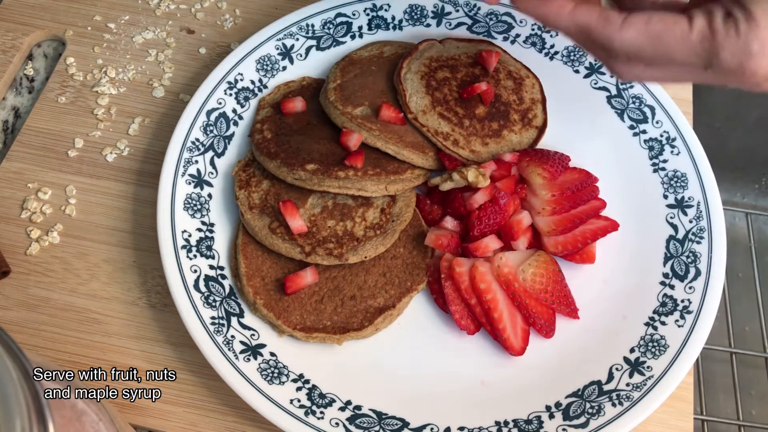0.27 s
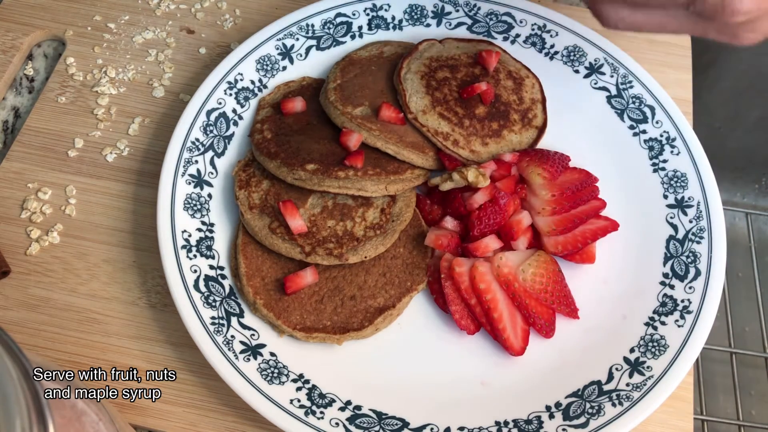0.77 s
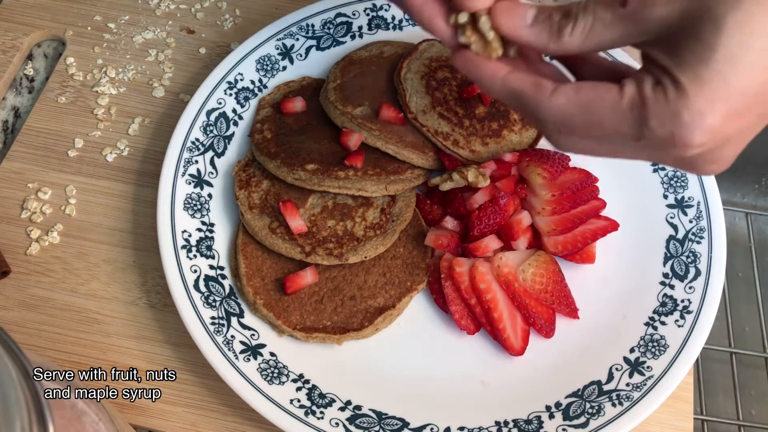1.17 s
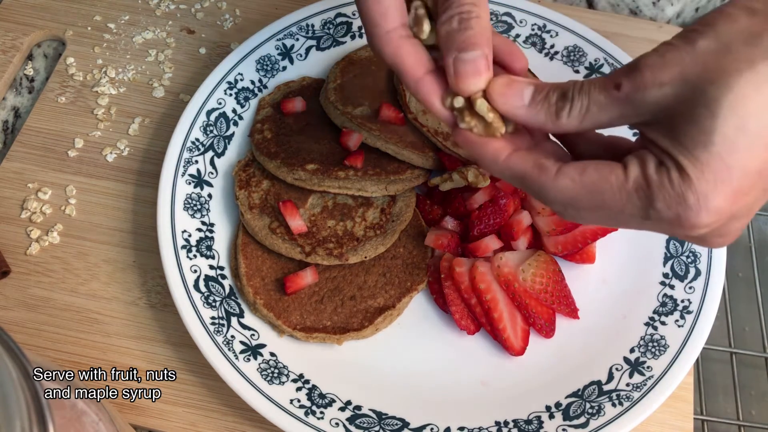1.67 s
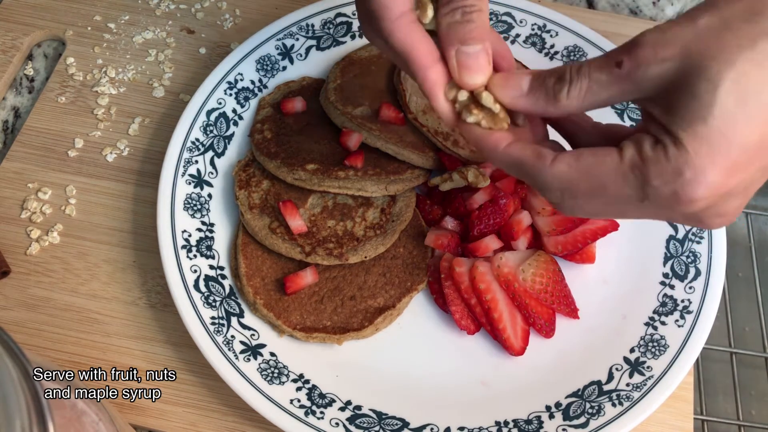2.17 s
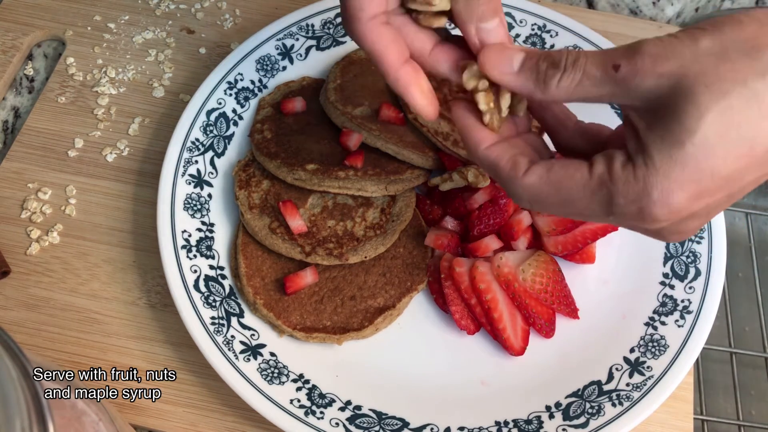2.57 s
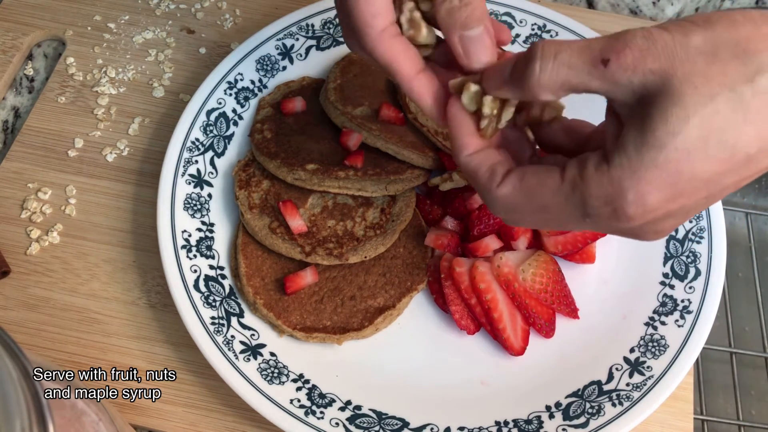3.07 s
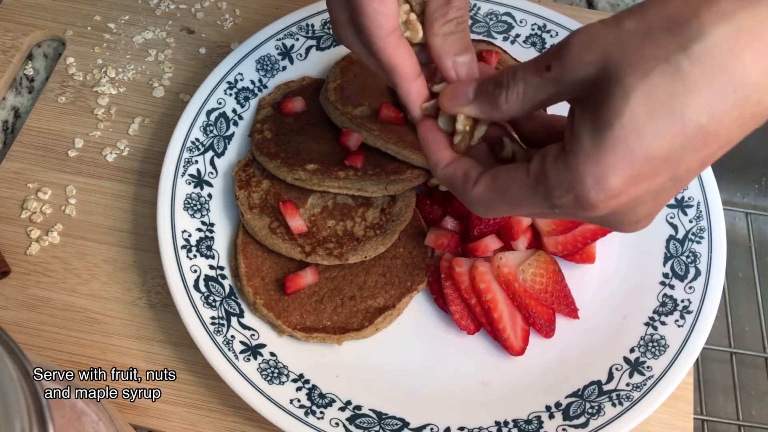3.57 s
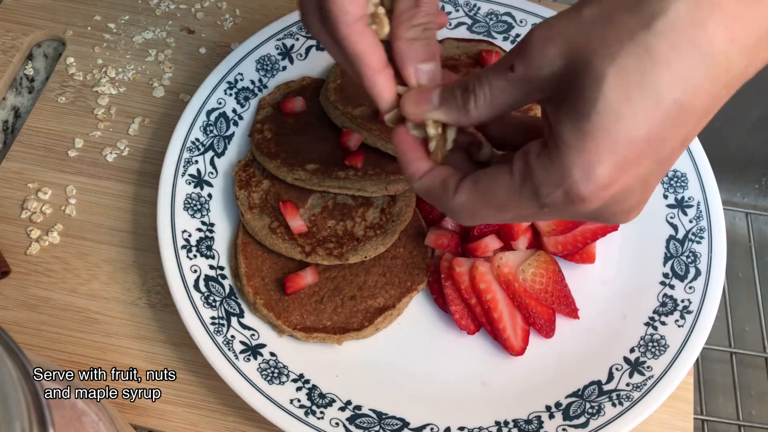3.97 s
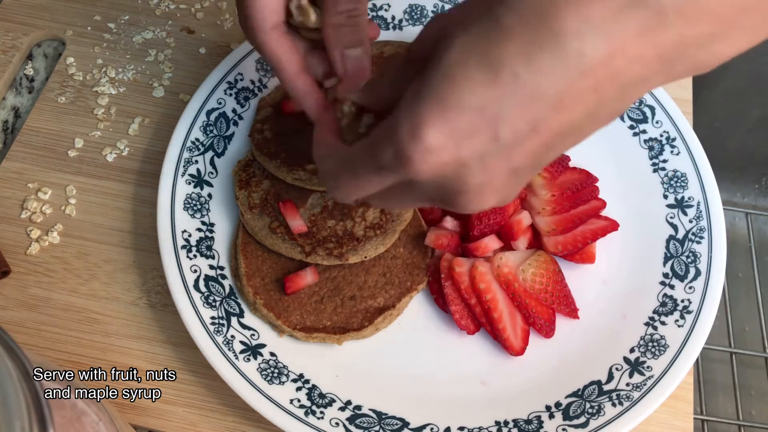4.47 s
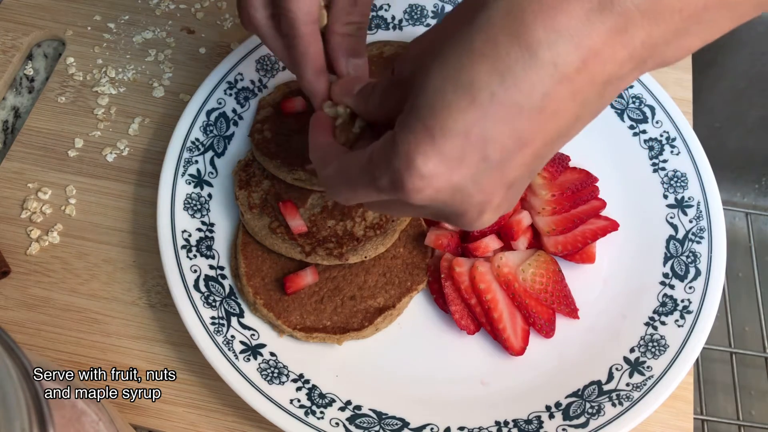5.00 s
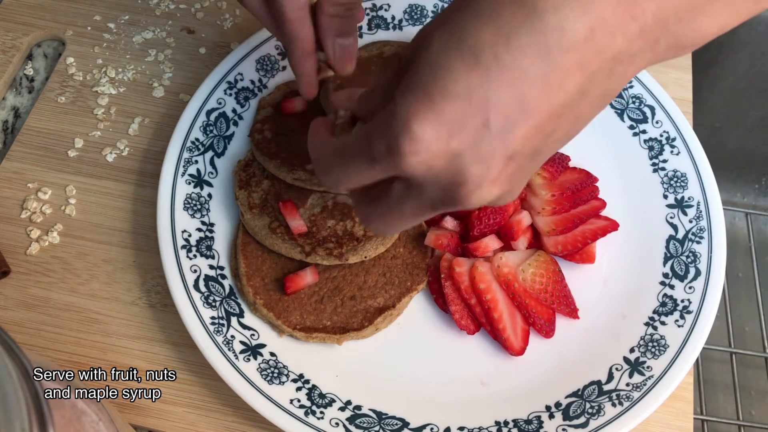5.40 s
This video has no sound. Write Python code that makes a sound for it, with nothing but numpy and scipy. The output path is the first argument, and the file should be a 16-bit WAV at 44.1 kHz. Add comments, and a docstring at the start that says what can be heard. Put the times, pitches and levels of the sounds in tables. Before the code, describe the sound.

Close, bright nut-breaking snaps and faint crumb ticks ring briefly in a small kitchen over low rumble, following a quiet cloth rustle.

```python
"""Fingers break walnuts over a plate of pancakes in a quiet kitchen, where air, a rumble and an appliance hum go on.
At first sleeves rustle (trains of tiny clicks), the cook's weight bumps softly (low noise) and skin hisses on nuts.
From about 1.6 s kernels crackle, chip and split: sharp noise snaps that ring for a few ms, with a duller knock.
The hardest split, near 1.9 s, overloads the recorder; the plate and the room throw every snap back.
More splits follow near 3.7 s; near 5.1 s a nut lands with a crack and a low thump, among chips, crumbs and taps."""
import sys
import numpy as np
from scipy import signal
from scipy.fft import rfft, irfft
from scipy.io import wavfile
from scipy.ndimage import uniform_filter1d

SR = 44100
rng = np.random.default_rng(int(sys.argv[2]) if len(sys.argv) > 2 else 0)


def dump(signal):
    """Clip the signal to [-1, 1] and save it as 16-bit WAV at the path in sys.argv[1]."""
    limited = np.clip(np.atleast_2d(signal).T, -1, 1)
    pcm = np.round(limited * 32767).astype(np.int16)
    wavfile.write(sys.argv[1], SR, pcm)


N = 248724  # length in samples
TIME = np.arange(N) / SR  # seconds

# In the colour tables only the shape counts: level_db is relative, per Hz of bandwidth.
# Colour of the still kitchen air: pitch_hz, level_db
AIR_COLOUR = [(20, 1), (35, -16), (55, -19.5), (90, -23.5), (160, -32), (320, -31.5), (550, -39),
              (900, -45), (2000, -47), (4500, -50), (10000, -46.5), (16000, -54.5)]
# Colour of the deep rumble: pitch_hz, level_db
RUMBLE_COLOUR = [(3, -10), (13, -3.5), (22, -15.5), (40, -36), (200, -73)]
# Tones of the appliance hum: pitch_hz, level_db (rms)
HUM_TONES = [(120, -69.5), (241, -76.5)]

# Sleeves rustle as the arms move: start_s, length_s, level_db (reached at the end)
ARM_MOVES = [(0.0, 0.27, -61), (0.56, 0.12, -63), (0.771, 0.19, -57.5), (1.084, 0.19, -57.5),
             (1.29, .27, -57), (2.42, 0.057, -57)]
# Colour of the rustling cloth: pitch_hz, level_db
CLOTH_COLOUR = [(60, -18), (150, -12.5), (260, -14.5), (340, 3.5), (440, 2), (490, -14), (620, -13),
                (760, -14.5), (1300, -19), (2200, -20.5), (4000, -31.5), (9000, -39.5)]
# Soft low bumps as the cook shifts weight at the counter: middle_s, length_s, level_db
WEIGHT_SHIFTS = [(.12, 0.29, -55.5), (.62, 0.09, -58.5), (1.19, 0.13, -54), (4.82, 0.099, -61)]
# Colour of those bumps: pitch_hz, level_db
SHIFT_COLOUR = [(30, -16), (80, 8.5), (150, 5.5), (220, -15), (330, -12.5), (700, -24), (2000, -62)]

# Skin slides on the nuts: middle_s, length_s, level_db
SKIN_RUBS = [(0.277, 0.22, -63), (1.212, 0.09, -65.5), (2.5, .1, -62.5), (2.755, 0.094, -60),
             (3.25, 0.44, -67), (3.65, .14, -62.5), (4.93, 0.27, -72), (5.3, 0.28, -67),
             (5.581, 0.08, -64.5)]
# Colour of the sliding skin: pitch_hz, level_db
SKIN_COLOUR = [(2000, -55), (5000, -21), (7000, -5.5), (8500, -0.5), (9700, -17), (10600, 1.5),
               (11600, -8.5), (16000, -8.5)]
# Colour of broken faces grinding together: pitch_hz, level_db
GRIND_COLOUR = [(300, -45), (1000, -33), (1800, -3.5), (2600, -10.5),
                (3500, 0.5), (5000, -1), (8000, 8.0), (14000, -22.5)]

# Near echoes off the plate, the board and the hands: middling delay_s, gain (factor)
NEAR_ECHOES = [(.0011, 0.18), (.0023, 0.22), (.0037, .22), (.0058, 0.14), (.0079, .16)]
# How long the room rings: pitch_hz, time to fall by 60 dB_s
ROOM_DECAY = [(300, 0.17), (1300, 0.42), (3500, 0.32), (6500, 0.24), (9500, 0.21), (15000, 0.13)]

# Fracture and knock levels below are relative: snap() adds its own boosts.
# Colour of a fracture: pitch_hz, level_db
CRACK_COLOUR = [(1000, -50), (3000, -38), (4300, -24), (5600, -13), (7000, -4), (7700, -7), (8600, -1),
                (10600, 2), (12200, -4.5), (14700, -10), (16500, -7.5)]
# Colour of the kernel's knock between the fingers: pitch_hz, level_db
KNOCK_COLOUR = [(120, -17), (220, -13), (380, -4), (700, -12.5), (1100, -4.5), (1400, -5), (1900, 0),
                (2250, -7.5), (2750, -5.5), (3300, 1.5), (3900, -3), (5000, 1), (8000, -10)]
# Snaps and taps with a knock level of their own: start_s, level_db, knock_db (relative to level_db)
KNOCKING_TAPS = [(0.4077, -41, -16), (2.3025, -28.5, -21.5), (3.675, -39, -19), (3.9281, -30, -21.5),
                 (4.6552, -47, -9.5), (4.7753, -52.5, -21), (4.81, -50.5, -12), (5.269, -48, -13),
                 (5.3848, -45, -7.5), (5.5563, -48.5, -6)]
# A single chip snaps off: start_s, level_db, brightness_hz
CHIP_SNAPS = [(1.6257, -28, 11600), (1.7412, -19, 9860), (1.7647, -14, 10530), (1.7798, -11, 10430),
              (1.8447, -37.5, 12000), (2.0996, -33.5, 9870), (2.2021, -23, 9200), (2.2232, -10.5, 11240),
              (2.238, -21, 11200), (2.2806, -27.5, 10300), (2.5198, -35.5, 10900), (2.5722, -33.5, 10700),
              (2.8001, -31, 11120), (2.817, -39, 10050), (2.8828, -31.5, 11300), (2.8988, -31, 10470),
              (3.0984, -45, 11100), (3.3201, -34.5, 12900), (3.5462, -36.5, 10830), (3.5989, -34, 10560),
              (3.6915, -32.5, 10400), (3.7253, -40, 12500), (3.756, -20, 10000), (4.006, -41.5, 10980),
              (4.2693, -27.5, 10500), (4.4851, -37, 9300), (4.67, -26, 10900), (5.0733, -23, 10400),
              (5.3453, -42, 12670)]
# A crack creeps on in small steps while its faces grind:
# start_s, length_s, level_db, brightness_hz, grinding_db
CREEPING_CRACKS = [(1.5833, 0.024, -25.5, 9000, -58), (2.1392, .043, -27.5, 9900, -50.5),
                   (2.8317, .011, -37, 11430, -73)]
# A kernel splits or a nut is set down hard: start_s, level_db, knock_db (relative to level_db),
# brightness_hz, thud_db, thud_pitch_hz, hand_jolt_db
HARD_CRACKS = [(1.8783, -2.5, -28.5, 9640, -29.5, 700, -61.5), (3.7385, -19, -21.5, 9550, -35.5, 1330, -55),
               (3.783, -14.5, -25.5, 10430, -32, 1060, -63), (5.0577, -18.5, -25, 11900, -34, 600, -38)]
# Every hard crack comes in three quick stages: delay_s, level_db (relative)
CRACK_STAGES = [(0, 1), (.0023, 0), (.0061, -3)]

AIR_DB = -48
MOVE_ATTACK_S, MOVE_RELEASE_S, MOVE_SWELL_DB = 0.022, 0.057, 2.5  # a move swells until it stops
CREEP_RUB_DB = -30  # hiss of skin, relative to the crack
HAND_HZ = 232  # the soft swing of the jolted hand
TAP_BRIGHT_HZ = 9470

# A chip of level CHIP_DB and brightness CHIP_HZ has the knock KNOCK_DB.
# The knock grows more slowly than the crack, and brighter chips knock less.
CHIP_DB, CHIP_HZ, KNOCK_DB = -29, 11200, -59.5
KNOCK_GROWTH, KNOCK_DB_PER_OCTAVE = .45, -17  # knock dB per crack dB; dB per octave of brightness
# A creeping crack starts hardest; its other steps fade unevenly over the run
FIRST_STEP_DB, CREEP_FADE_DB, STEP_SPREAD_DB = 6, -4.5, 3
STEP_JITTER = .14  # typical shift of a step, as a share of the gap between steps
EDGE_HZ = 16200  # top of the recorder's range


def amp(db):
    """Turns decibels into a gain."""
    return 10 ** (np.asarray(db) / 20)


def unit(x):
    """Scales a sound to rms 1."""
    return x / np.sqrt(np.mean(x ** 2) + 1e-20)


def read(points, hz):
    """Reads a table between its points, with pitch on a log scale."""
    f, value = np.transpose(points)
    return np.interp(np.log(hz + 1), np.log(f + 1), value)


def add(mix, s, sound):
    """Mixes a sound in, starting at time s."""
    part = mix[max(round(s * SR), 0):][:len(sound)]
    part += sound[:len(part)]


def colour(x, points):
    """Shapes the spectrum of a steady sound by a table, at rms 1."""
    gain = amp(read(points, np.fft.rfftfreq(len(x), 1 / SR)))
    return unit(irfft(rfft(x) * gain, len(x)))


def burst(envelope, gain_db, size):
    """Makes a short random ring of energy 1; the colour filter only acts forward in time."""
    spectrum = np.fft.fft(envelope * rng.standard_normal(len(envelope)))
    # Flatten the broad colour, so that chance sets only the narrow resonances
    broad = np.sqrt(uniform_filter1d(abs(spectrum) ** 2, size, mode="wrap"))
    log_gain = np.log(amp(gain_db) / broad)
    causal_filter = np.exp(np.conj(signal.hilbert(log_gain)))
    ring = np.fft.ifft(spectrum * causal_filter).real
    return ring / np.linalg.norm(ring)


def swells(rows):
    """Makes a gain of smooth humps from rows of middle_s, length_s, level_db."""
    return sum(amp(db) * np.exp(-(2 * (TIME - s) / length) ** 2) for s, length, db in rows)


def slips(per_s, spread_db):
    """Makes a dense random train of tiny clicks of uneven size, as when surfaces slip."""
    size = rng.choice([-1, 1], N) * amp(spread_db * rng.uniform(-1, 1, N))
    return size * (rng.random(N) < per_s / SR)


def kitchen(rumble_db=-48):
    """Still air and a deep rumble are coloured noise; the appliance hum is steady pure tones."""
    air = amp(AIR_DB) * colour(rng.standard_normal(N), AIR_COLOUR)
    rumble = amp(rumble_db) * colour(rng.standard_normal(N), RUMBLE_COLOUR)
    hum = sum(amp(db) * np.sqrt(2) * np.sin(2 * np.pi * hz * TIME) for hz, db in HUM_TONES)
    return air + rumble + hum


def room(x, tail_db=-14.5, rise_s=.004, size=16384):
    """Many mixed reflections form a tail that rises quickly and dies away, highest treble first."""
    t = TIME[:size]
    slowest = max(t60 for _, t60 in ROOM_DECAY)
    rise = 1 - np.exp(-(t / rise_s) ** 2)
    wash = burst(amp(-60 * t / slowest) * rise, np.zeros(size), size=41)
    # The wash fades at the slowest rate; each pitch now gets the rest of its own fade
    hz, at, z = signal.stft(wash, SR, nperseg=256)
    extra_fade = 1 / read(ROOM_DECAY, hz)[:, None] - 1 / slowest
    tail = signal.istft(z * amp(-60 * at * extra_fade), SR)[1]
    return amp(tail_db) * signal.fftconvolve(x, tail / np.linalg.norm(tail))[:N]


def movement(start, length, db):
    """An arm move makes its cloth louder as it gathers speed, then lets it die away."""
    t = TIME - start
    attack = np.clip(t / MOVE_ATTACK_S, 0, 1)
    swell_db = MOVE_SWELL_DB * (np.clip(t / length, 0, 1) - 1)
    release = np.exp(-np.maximum(t - length, 0) / MOVE_RELEASE_S)
    return attack * amp(db + swell_db) * release


def clothes():
    """Many small folds slip in a soft, dull rustle; shifting weight makes low bumps."""
    moving = np.max([movement(*row) for row in ARM_MOVES], axis=0)
    rustle = moving * colour(slips(8000, 6), CLOTH_COLOUR)
    bumps = swells(WEIGHT_SHIFTS) * colour(rng.standard_normal(N), SHIFT_COLOUR)
    return rustle + bumps


def rubbing(overhang=1.6):
    """Skin slips finely on the wrinkled kernel; broken faces grind coarsely and sound its body."""
    fine, coarse = slips(1600, 14), slips(900, 9)
    skin, faces = swells(SKIN_RUBS), np.zeros(N)
    for s, length, db, _, grind_db in CREEPING_CRACKS:
        slide_s = overhang * length  # the sliding outlasts the steps
        slide = swells([(s + slide_s / 2, slide_s, db)])
        skin = skin + amp(CREEP_RUB_DB) * slide
        faces = faces + amp(grind_db - db) * slide
    return skin * colour(fine, SKIN_COLOUR) + faces * colour(coarse, GRIND_COLOUR)


def echoed(x, wander=.25):
    """The plate, board and hands echo a snap; the paths change each time as the hands move."""
    out = x.copy()
    shifts = rng.uniform(-0.83, 1, len(NEAR_ECHOES))
    for (delay, gain), shift in zip(NEAR_ECHOES, shifts):
        add(out, delay * np.exp(wander * shift), gain * x)
    return out


def thud(hz, decay_cycles=0.61):
    """A soft, heavy body swings and is damped within about a cycle."""
    turns = hz * TIME[:SR // 10]
    return np.sin(2 * np.pi * turns) * np.exp(-turns / decay_cycles)


def snap(db, knock_db, bright_hz, crack_s=.0007, ring_s=.0035, ring_share=0.22, knock_s=0.0063,
         tilt_db=45, centre_hz=10200, crack_db=17.5, body_db=23, size=2048):
    """A fracture is a sudden break, the fragment's short ring and the kernel's duller knock."""
    t, hz = np.arange(size) / SR, abs(np.fft.fftfreq(size, 1 / SR))
    # Smaller fragments sound brighter: tilt the colour around centre_hz
    octaves = np.log2(np.maximum(hz, centre_hz / 2) / centre_hz)
    tilt = tilt_db * np.log2(bright_hz / centre_hz) * octaves
    crack_fade = np.exp(-t / crack_s) + ring_share * np.exp(-t / ring_s)
    crack = burst(crack_fade, read(CRACK_COLOUR, hz) + tilt, size=121)
    knock = burst(np.exp(-t / knock_s), read(KNOCK_COLOUR, hz), size=15)
    return amp(db + crack_db) * crack + amp(db + knock_db + body_db) * knock


def chip(db, bright_hz):
    """A small fracture knocks according to its strength and size."""
    growth_db = KNOCK_GROWTH * (db - CHIP_DB)
    size_db = KNOCK_DB_PER_OCTAVE * np.log2(bright_hz / CHIP_HZ)
    return snap(db, KNOCK_DB + growth_db + size_db - db, bright_hz)


def crumbs(per_s=12, crumb_db=-53.5, spread_db=3, knock_db=-17.5, bright_hz=10500, spread_hz=700,
           count=60):
    """Crumbs tick faintly at random, as tiny fractures, from the first creeping crack on."""
    s, sounds = CREEPING_CRACKS[0][0], []
    for wait, strength, bright in rng.standard_normal((count, 3)):
        s += (wait ** 2 + 1) / (2 * per_s)  # an uneven wait, 1 / per_s on average
        tick = snap(crumb_db + spread_db * strength, knock_db, bright_hz + spread_hz * bright)
        sounds.append((s, tick))
    return sounds


def crackles(count=6):
    """A creeping crack breaks in small steps, jittered about an even spacing, that fade over the run."""
    sounds = []
    for s, length, db, bright_hz, _ in CREEPING_CRACKS:
        sounds.append((s, chip(db + FIRST_STEP_DB, bright_hz)))
        jitter = STEP_JITTER * rng.standard_normal(count - 1)
        for part in (np.arange(1, count) + jitter) / (count - 1):
            step_db = db + CREEP_FADE_DB * part + STEP_SPREAD_DB * rng.standard_normal()
            sounds.append((s + part * length, chip(step_db, bright_hz)))
    return sounds


def hard_cracks():
    """A kernel that splits, or a nut set down hard, cracks in several quick fractures."""
    sounds = []
    for s, db, knock_db, bright_hz, *_ in HARD_CRACKS:
        for delay, stage_db in CRACK_STAGES:
            sounds.append((s + delay, snap(db + stage_db, knock_db, bright_hz)))
    return sounds


def walnuts(thud_delay_s=0.0021):
    """All fractures, taps and thuds of the nuts: as heard close by, and as sent into the room."""
    chips = [(s, chip(db, bright_hz)) for s, db, bright_hz in CHIP_SNAPS]
    taps = [(s, snap(db, knock_db, TAP_BRIGHT_HZ)) for s, db, knock_db in KNOCKING_TAPS]
    near, sent = np.zeros(N), np.zeros(N)
    for s, sound in hard_cracks() + crackles() + chips + taps + crumbs():
        add(near, s, echoed(sound))
        add(sent, s, sound)
    for s, *_, thud_db, thud_hz, hand_db in HARD_CRACKS:
        jolt = amp(thud_db) * thud(thud_hz) + amp(hand_db) * thud(HAND_HZ)
        add(near, s + thud_delay_s, jolt)
        add(sent, s + thud_delay_s, jolt)
    return near, sent


def scene(room_db=1):
    """Puts the nuts and hands in the room, over the clothes and the still kitchen."""
    near, sent = walnuts()
    skin = rubbing()
    reverb = amp(room_db) * room(sent + skin)
    return (near + skin + reverb + clothes() + kitchen())[None]


def band_limit(x):
    """Cuts steeply above the recorder's range."""
    low_pass = signal.firwin(161, EDGE_HZ, window=("kaiser", 7), fs=SR)
    return signal.oaconvolve(x, low_pass[None], "same")


def record(dry):
    """The recorder limits the band, clips at full scale, and limits the band again."""
    clipped = np.clip(band_limit(dry), -1, 1)
    return band_limit(clipped)


dry = scene()
out = record(dry)
dump(out)
```